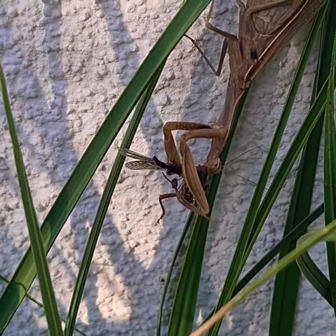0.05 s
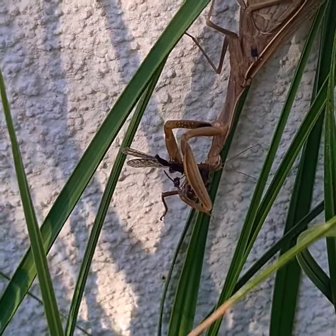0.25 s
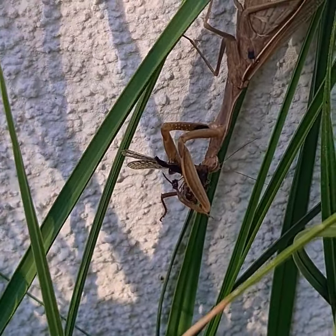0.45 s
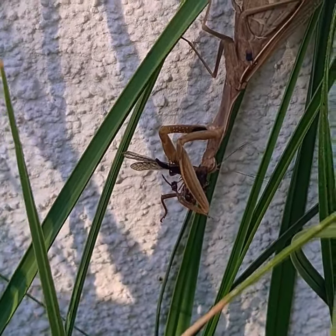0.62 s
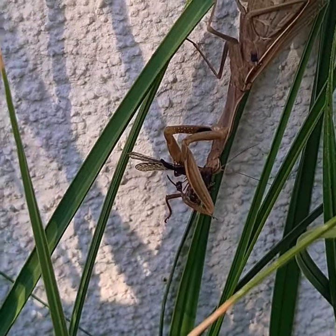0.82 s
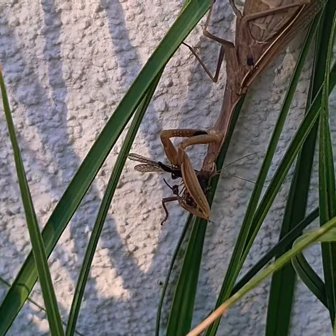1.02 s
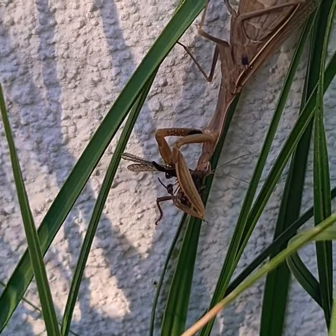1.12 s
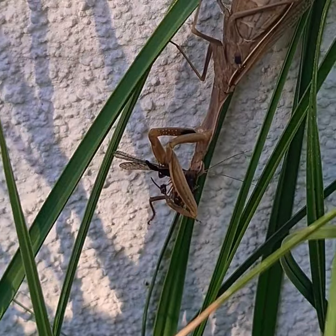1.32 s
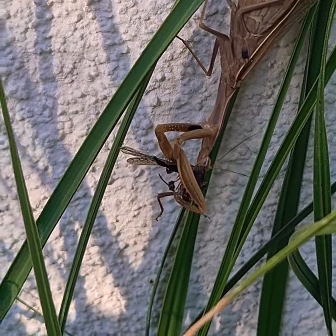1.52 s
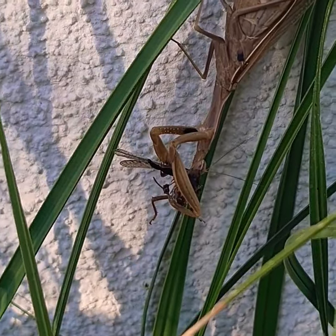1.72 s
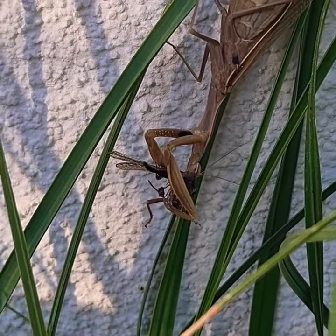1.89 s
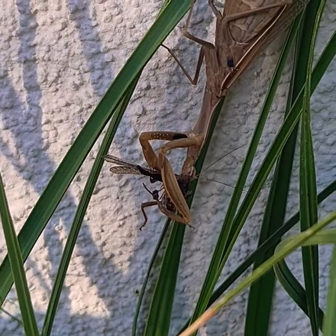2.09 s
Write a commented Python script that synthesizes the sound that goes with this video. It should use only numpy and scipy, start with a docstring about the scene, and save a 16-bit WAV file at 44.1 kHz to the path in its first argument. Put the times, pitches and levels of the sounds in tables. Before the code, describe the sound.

Soft wind rumbles on the microphone, with long grass rustling faintly.

```python
"""Long grass beside a wall, in a soft breeze, heard close up on a hand-held camera.
Wind eddies buffet the two microphone ports, with a few soft low bumps; a hand brushes the camera.
Blades slide over each other with a friction hiss, squeak faintly and snap; there is one dull tap.
Behind them lie a steady hiss of distant leaves and a faint, far-off whine."""
import sys
import numpy as np
from scipy import signal
from scipy.fft import rfft, irfft
from scipy.io import wavfile
from scipy.ndimage import uniform_filter1d

SR = 44100
rng = np.random.default_rng(int(sys.argv[2]) if len(sys.argv) > 2 else 0)


def digitize_waveform(pressure):
    """Quantize a signal to 16-bit integers and store it at the path in sys.argv[1].

    Rows of a 2-D input are taken as channels; values are limited to [-1, 1].
    """
    field = np.atleast_2d(pressure).T
    bounded = np.clip(field, -1, 1)
    quanta = np.round(bounded * 32767).astype(np.int16)
    wavfile.write(sys.argv[1], SR, quanta)


N = 94815
TIME_S = np.arange(N) / SR
FREQ_HZ = np.fft.rfftfreq(N, 1 / SR)


def amp(db):
    """Decibels to gain."""
    return 10 ** (np.asarray(db) / 20)


def unit_rms(x):
    """Scales to rms 1."""
    return x / np.sqrt(np.mean(x ** 2) + 1e-20)


def over_freq(table):
    """A frequency table per bin, interpolated on a log axis."""
    hz, value = np.transpose(table)
    return np.interp(np.log(FREQ_HZ + 1), np.log(hz + 1), value)


def over_time(table):
    """Each column of a time table, per sample."""
    times_s, *columns = np.transpose(table)
    return np.array([np.interp(TIME_S, times_s, column) for column in columns])


def pan(pan_db):
    """Left and right gains; pan is left minus right."""
    return amp(np.array([[.5], [-.5]]) * pan_db)


def colour(x, gain_db):
    """Filters by a gain per bin; rms 1."""
    return unit_rms(irfft(rfft(x) * amp(gain_db), N))


def band_db(centre_hz, width_hz, power=2):
    """Resonance curve, 6 dB down at the band edges."""
    return -20 * np.log10(1 + (2 * (FREQ_HZ - centre_hz) / width_hz) ** power)


def noise_spectra(correlation):
    """White noise spectra for two partly alike ports."""
    left, other = rfft(rng.standard_normal((2, N)))
    return np.array([left, correlation * left + np.sqrt(1 - correlation ** 2) * other])


def patchy(x, depth_db, corner_hz=6240):
    """Drifts the colour in small random patches, less above the corner; rms 1."""
    hz, _, frames = signal.stft(x, SR, nperseg=1024, noverlap=768)
    patches = rng.standard_normal(frames.shape[:0:-1])
    patches = uniform_filter1d(patches, size=9, axis=0)  # time
    patches = unit_rms(uniform_filter1d(patches, size=3, axis=1)).T  # frequency
    frames = frames * amp(depth_db * patches / (1 + (hz[:, None] / corner_hz) ** 2))
    return unit_rms(signal.istft(frames, SR, nperseg=1024, noverlap=768)[1][:, :N])


# port balance (frequency [Hz], pan [dB])
PORT_BALANCE = [(100, -1), (1100, 0.5), (2200, -2), (3000, -1.5), (4200, -5.5), (7000, -5.5), (8100, 3.5),
                (9500, -6), (15000, -9)]
def at_ports(spectra, gain_db):
    """Colours a sound and leans most of its treble to the right port; rms 1."""
    return colour(irfft(spectra * pan(over_freq(PORT_BALANCE)), N), gain_db)


# hiss spectrum (frequency [Hz], relative density [dB])
HISS_SPECTRUM = [(100, 15.5), (300, -2.5), (480, -7), (620, -1), (760, -4.5), (1050, -3), (1550, -5),
                 (2300, -3), (3000, 1), (3800, -3.5), (5500, -5), (7200, -2.5), (8000, -9), (8900, -21.5),
                 (9800, -17.5), (12000, -17), (15500, -24)]
# hiss envelope (time [s], level [dB])
HISS_ENVELOPE = [(0, -56.5), (.42, -54), (.55, -56), (.92, -56.5), (1.25, -53.5), (1.45, -53.5),
                 (2.15, -55.5)]
# likeness of the hiss at the two ports (frequency [Hz], correlation [-1..1])
HISS_CORRELATION = [(100, 0.53), (600, 0.64), (900, -0.15), (1200, 0.1), (1700, -0.083), (2500, 0.0078),
                    (4000, 0.12), (15000, -0.082)]
def leaf_hiss():
    """Distant leaves merge into a steady outdoor hiss."""
    hiss = at_ports(noise_spectra(over_freq(HISS_CORRELATION)), over_freq(HISS_SPECTRUM))
    return amp(over_time(HISS_ENVELOPE)) * patchy(hiss, depth_db=3.5)


# whine track (time [s], centre [Hz], level [dB])
WHINE_TRACK = [(0, 994, -78), (.6, 1009, -78.5), (.95, 949, -76.5), (1.15, 998, -79.5), (1.42, 930, -67.5),
               (1.56, 959, -71.5), (1.66, 969, -66.5), (1.84, 926, -68.5), (1.93, 917, -75),
               (2.05, 890, -65.5), (2.15, 870, -77)]
def far_whine(width_hz=80, correlation=0.38):
    """A narrow band of noise, like distant tyres, slowly sinking in pitch."""
    centre_hz, level_db = over_time(WHINE_TRACK)
    band = amp(band_db(0, width_hz))
    in_phase = irfft(noise_spectra(correlation) * band, N)
    quadrature = irfft(noise_spectra(correlation) * band, N)
    carrier = np.exp(2j * np.pi * np.cumsum(centre_hz) / SR)
    return amp(level_db) * unit_rms(((in_phase + 1j * quadrature) * carrier).real)


def friction_swells(table):
    """Short, smooth swells of friction noise, one resonance each."""
    out = np.zeros((2, N))
    for peak_s, length_s, level_db, centre_hz, width_hz, pan_db in table:
        ring = colour(irfft(noise_spectra(.5), N), band_db(centre_hz, width_hz, power=4))
        envelope = np.exp(-2 * ((TIME_S - peak_s) / length_s) ** 2)
        out += pan(pan_db) * amp(level_db) * ring * envelope
    return out


# brushes (time [s], length [s], level [dB], centre [Hz], width [Hz], pan [dB])
HAND_BRUSHES = [(.232, 0.022, -53, 221, 70, -19), (.305, 0.055, -57.5, 180, 108, -19),
                (.455, 0.026, -53.5, 201, 70, -21.5), (.72, 0.042, -53, 160, 110, 0),
                (.915, 0.0515, -53, 234, 50, 3.5), (.975, 0.054, -61.5, 210, 80, -2)]
def hand_brushes():
    """A hand rubs the camera, soft and low."""
    return friction_swells(HAND_BRUSHES)


# tap (time [s], level [dB], pan [dB])
TAP_HITS = [(1.3121, -42.5, 14)]
# tap modes (frequency [Hz], gain [dB], decay [s])
TAP_RESONANCES = [(1180, -16, 0.0029), (1860, -3.5, 0.00083), (2760, -7, .0007), (3110, -18.5, 0.014)]
def dull_tap():
    """A small click on the left rings in a few damped modes."""
    out = np.zeros((2, N))
    for start_s, level_db, pan_db in TAP_HITS:
        age_s = np.maximum(TIME_S - start_s, 0)
        for hz, gain_db, decay_s in TAP_RESONANCES:
            ring = np.sin(2 * np.pi * hz * age_s) * np.exp(-age_s / decay_s)
            out += pan(pan_db) * amp(level_db + gain_db) * ring
    return out


# squeaks (time [s], length [s], level [dB], centre [Hz], width [Hz], pan [dB])
BLADE_SQUEAKS = [(.08, 0.067, -64, 4310, 250, -11), (.10, 0.031, -62, 2970, 200, 0),
                 (.18, 0.038, -65, 1340, 250, -8), (.39, 0.038, -61, 3410, 304, 5),
                 (1.345, 0.039, -63.5, 3080, 300, -3), (1.45, 0.036, -63, 2980, 90, -3),
                 (1.727, 0.022, -62, 3080, 130, -8), (1.995, 0.037, -67.5, 3380, 100, -2),
                 (2.1, 0.068, -72, 3020, 88.8, 1)]
def blade_squeaks():
    """Rubbing blades give faint, thin squeaks and scrapes."""
    return friction_swells(BLADE_SQUEAKS)


# snaps (time [s], level [dB], centre [Hz], width [Hz], decay [s], pan [dB])
BLADE_SNAPS = [(0.0596, -54.5, 11900, 1500, 0.0058, -21.5), (0.079, -58, 4400, 1500, 0.0057, -15),
               (.074, -63, 12000, 1500, 0.024, -22), (0.267, -47.5, 13400, 4000, 0.0029, -18),
               (0.2675, -47.5, 7080, 3000, .007, -7.5), (.374, -55, 2300, 1800, 0.0023, -6),
               (0.432, -57, 8000, 9000, 0.004, 3), (.772, -68, 7500, 8000, .007, -9)]
def blade_snaps():
    """A dry blade slips free with a brief, bright crackle."""
    out = np.zeros((2, N))
    for start_s, level_db, centre_hz, width_hz, decay_s, pan_db in BLADE_SNAPS:
        crackle = colour(rng.standard_normal((2, N)), band_db(centre_hz, width_hz))
        envelope = (TIME_S >= start_s) * np.exp(-abs(TIME_S - start_s) / decay_s)
        out += pan(pan_db) * amp(level_db) * crackle * envelope
    return out


# early reflections (delay [s], gain [dB])
REFLECTIONS = [(.0023, -28), (.0041, -17), (.0093, -8.5)]
def wall_and_ground(x):
    """Nearby surfaces add delayed, weaker copies."""
    out = x.copy()
    for delay_s, gain_db in REFLECTIONS:
        out += amp(gain_db) * np.pad(x, ((0, 0), (round(delay_s * SR), 0)))[:, :N]
    return out


# strokes (start [s], length [s], level [dB], pan [dB], dryness [dB], attack [s], release [s])
BLADE_STROKES = [(-.03, 0.22, -56.5, -3, 5, 0.027, 0.072), (0.132, 0.25, -57, -3.5, 3, 0.033, 0.12),
                 (.25, 0.26, -58.5, -2.5, 1.5, 0.038, 0.13), (0.986, .21, -56, 0.5, -1, 0.048, 0.064),
                 (1.318, .11, -56.5, -1, -1, 0.038, 0.066)]
# blade friction spectrum (frequency [Hz], relative density [dB])
BLADE_SPECTRUM = [(200, -20), (700, -11.5), (1300, -7.5), (2300, -7), (3300, 0.5), (4400, 1), (5500, -0.5),
                  (7200, 1), (8100, -4.5), (8900, -14.5), (10000, -12), (12000, -12.5), (15500, -15.5)]
def sliding_blades(catches_per_s=3000, catch_share=0.31, flutter_db=1.26, flutter_hz=30, dry_hz=8300):
    """Blades slide in strokes: tiny catches in a friction hiss, brighter when dry."""
    out = np.zeros((2, N))
    treble = 1 - 1 / (1 + (FREQ_HZ / dry_hz) ** 20)
    for start_s, length_s, level_db, pan_db, dry_db, attack_s, release_s in BLADE_STROKES:
        sizes = amp(2 * np.minimum(rng.exponential(1, N), 4))  # 0 to 8 dB
        catches = rng.standard_normal((2, N)) * sizes * (rng.random(N) < catches_per_s / SR)
        friction = np.sqrt(catch_share) * rfft(unit_rms(catches))
        friction += np.sqrt(1 - catch_share) * noise_spectra(0)
        flutter = colour(rng.standard_normal(N), band_db(0, 2 * flutter_hz))
        rise = np.clip((TIME_S - start_s) / attack_s, 0, 1)
        fall = np.clip((start_s + length_s - TIME_S) / release_s, 0, 1)
        shelf_db = dry_db * treble
        friction *= pan(-.5 * shelf_db)  # dry treble leans right
        rub = patchy(at_ports(friction, over_freq(BLADE_SPECTRUM) + shelf_db), depth_db=2.5)
        out += pan(pan_db) * rise * fall * amp(level_db + flutter_db * flutter) * rub
    return out


# bumps (time [s], level [dB], pitch [Hz], pan [dB])
PORT_BUMPS = [(0.2313, -31.5, 101, -25.5), (0.342, -40, 62, -33), (0.698, -21.5, 94.4, 2),
              (.752, -28, 69.5, 0), (.804, -20, 78, 3), (1.818, -38.5, 61, 18.5)]
def port_bumps(sigma_cycles=0.46):
    """Each soft bump is one short swing of pressure on the microphone."""
    out = np.zeros((2, N))
    for centre_s, level_db, hz, pan_db in PORT_BUMPS:
        cycles = (TIME_S - centre_s) * hz
        envelope = np.exp(-.5 * (cycles / sigma_cycles) ** 2)
        out += pan(pan_db) * amp(level_db) * np.sin(2 * np.pi * cycles) * envelope
    return out


# gusts at the ports (time [s], left level [dB], right level [dB])
GUSTS = [(0, -48.5, -53), (.12, -40.5, -40.5), (.205, -48, -50), (.255, -43, -31), (.34, -38, -34.5),
         (.43, -35, -37), (.57, -40.5, -41), (.68, -30.5, -32.5), (.82, -33, -33), (.94, -43.5, -45.5),
         (1.01, -37.5, -35.5), (1.08, -48, -43.5), (1.21, -50, -37.5), (1.46, -44.5, -46.5),
         (1.63, -45, -39), (1.86, -49, -42), (1.98, -50, -52), (2.15, -49.5, -48.5)]
# buffeting spectrum (frequency [Hz], relative density [dB])
EDDY_SPECTRUM = [(10, -18), (25, -5), (42, 5.5), (75, 6), (105, -6), (150, -16), (240, -28), (330, -45),
                 (500, -52.5), (1200, -112)]
def wind_buffeting(correlation=0.084, steadiness=0.66, knee_hz=89, brighten_db_per_db=0.85):
    """Eddies rumble at each port; stronger gusts reach higher in frequency."""
    level_db = over_time(GUSTS)
    eddies = colour(irfft(noise_spectra(correlation), N), over_freq(EDDY_SPECTRUM))
    local_power = uniform_filter1d(eddies ** 2, size=3000, axis=1) + 1e-6
    eddies = unit_rms(eddies / local_power ** (steadiness / 2))
    small_eddies = irfft(rfft(eddies) * (1 - 1 / (1 + (FREQ_HZ / knee_hz) ** 4)), N)
    large_eddies = eddies - small_eddies
    brightening = amp(brighten_db_per_db * (level_db - level_db.mean()))
    return amp(level_db) * (large_eddies + small_eddies * brightening)


def scene():
    """All sources at the two ports."""
    return (wind_buffeting() + port_bumps() + hand_brushes() + leaf_hiss()
            + wall_and_ground(sliding_blades()) + blade_snaps() + blade_squeaks()
            + dull_tap() + far_whine())


def record(dry):
    """The camera's band limit: a steep low-pass."""
    cutoff_hz = 15600
    lowpass = signal.firwin(511, cutoff_hz, window=("kaiser", 9), fs=SR)
    return signal.oaconvolve(dry, lowpass[None], "same")


dry = scene()
out = record(dry)
digitize_waveform(out)
```